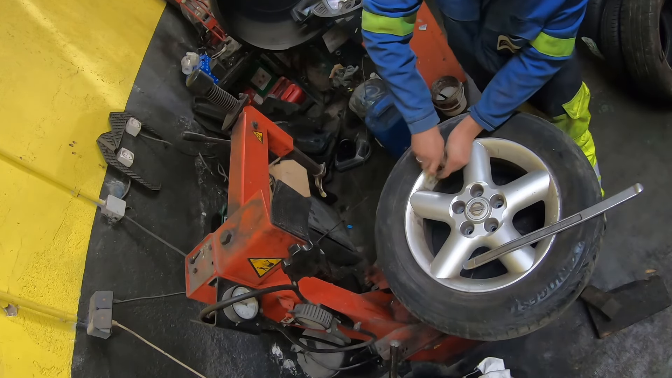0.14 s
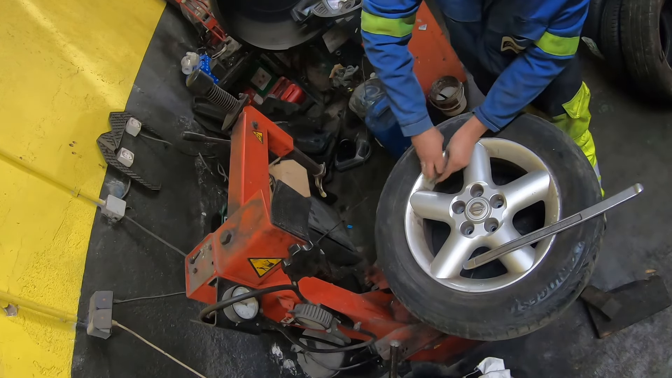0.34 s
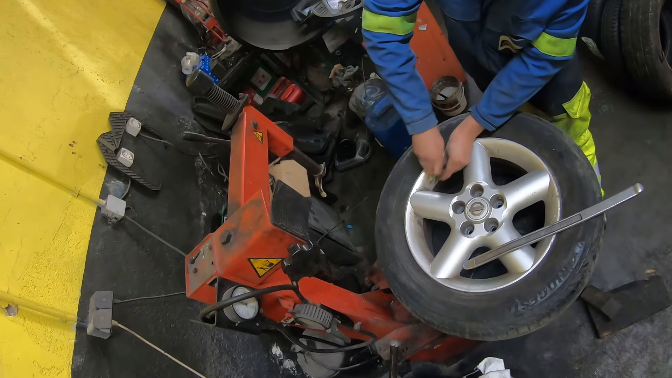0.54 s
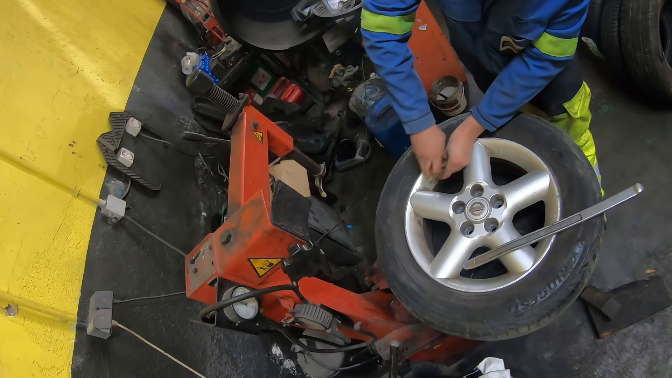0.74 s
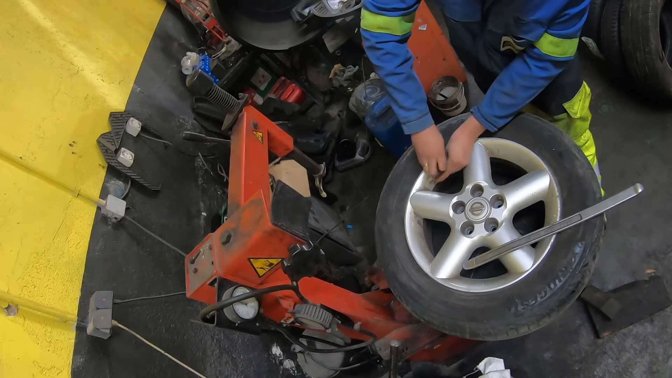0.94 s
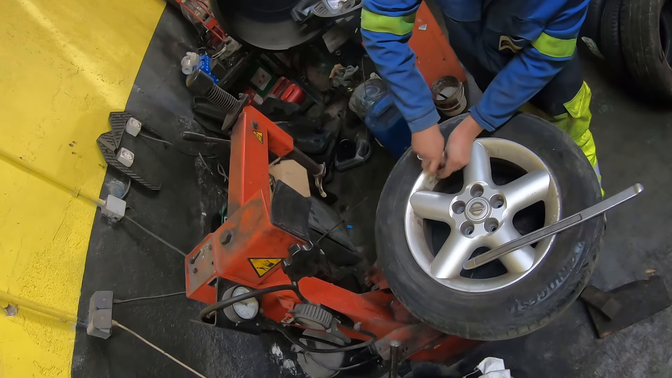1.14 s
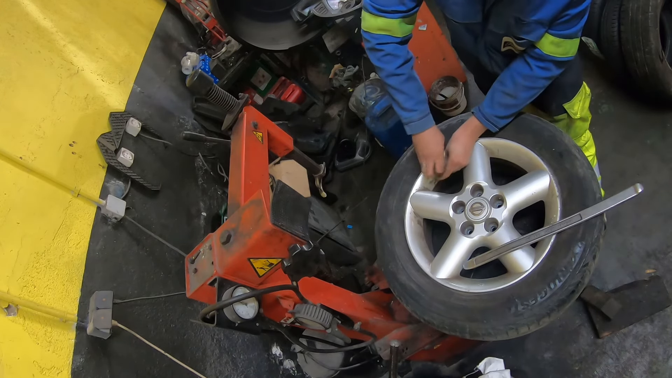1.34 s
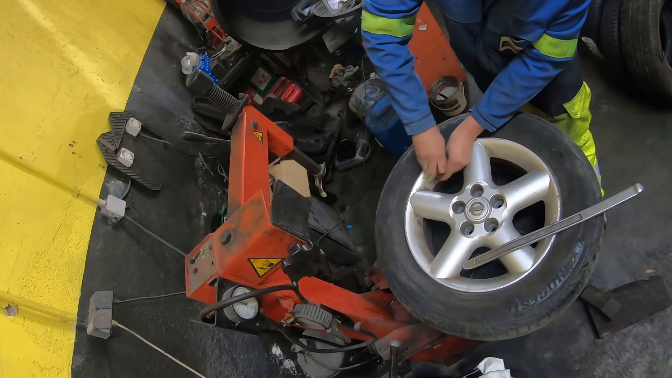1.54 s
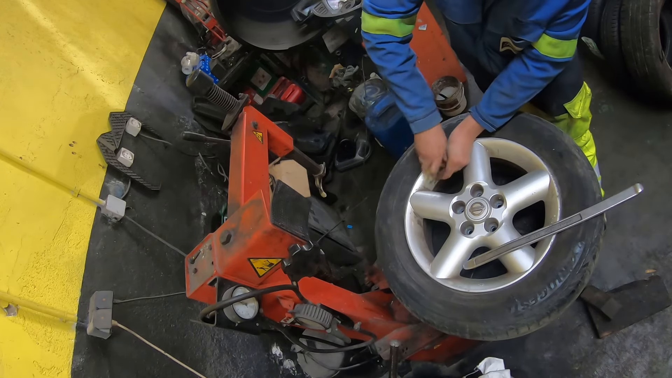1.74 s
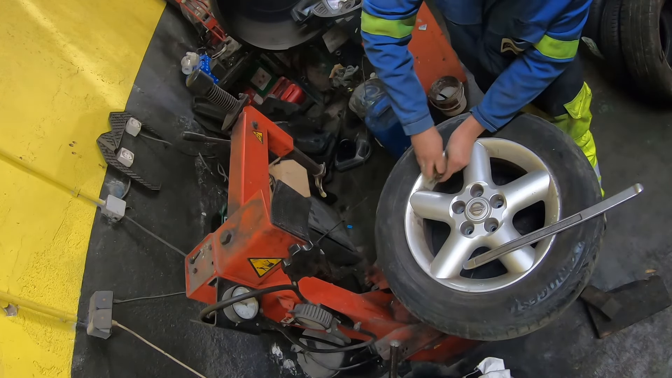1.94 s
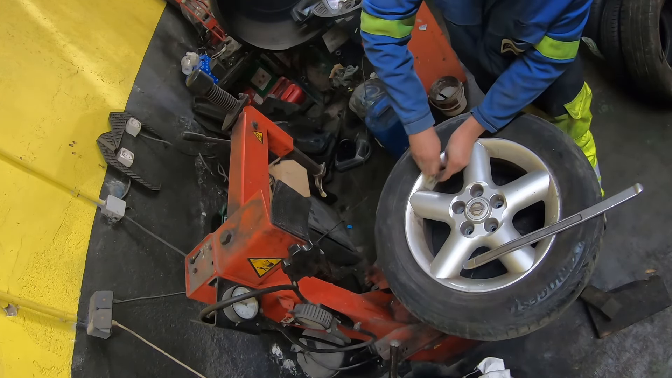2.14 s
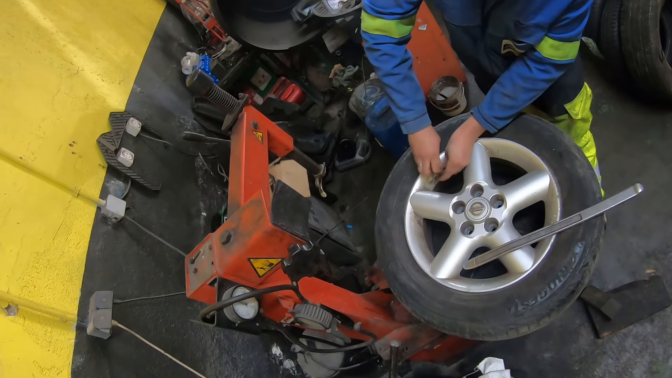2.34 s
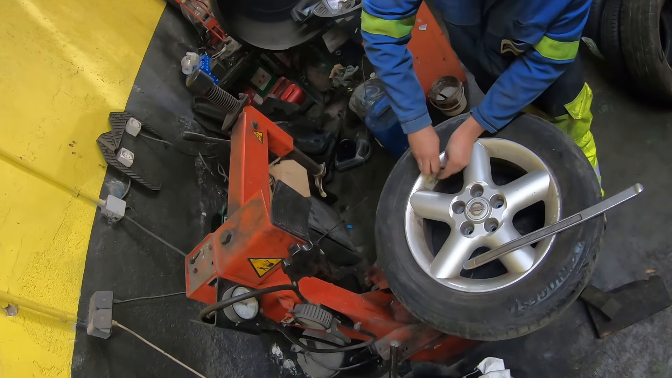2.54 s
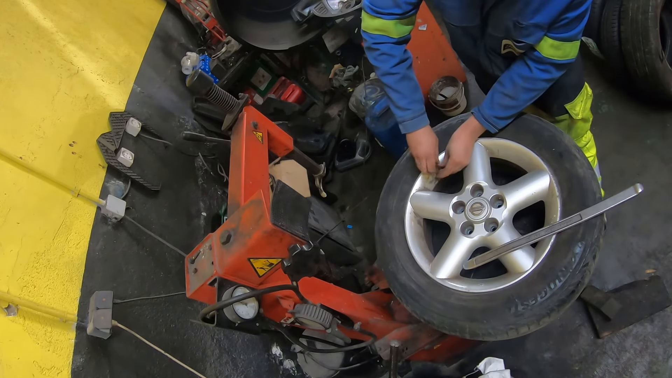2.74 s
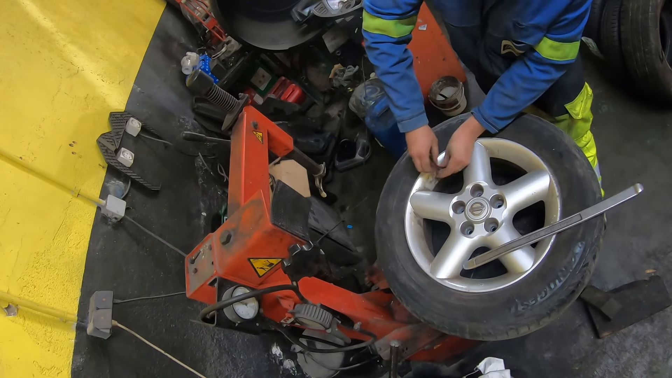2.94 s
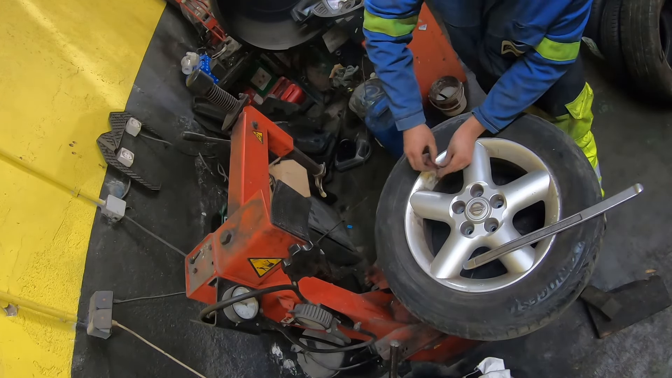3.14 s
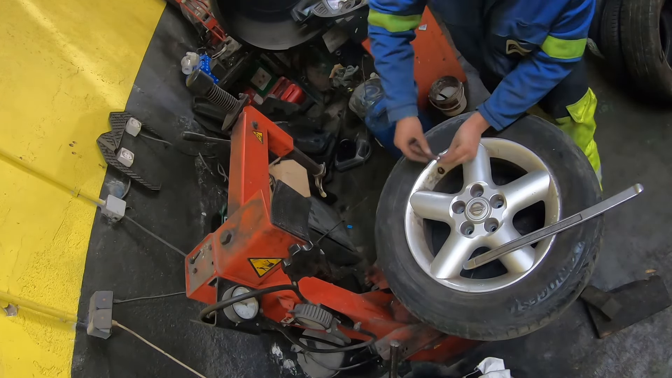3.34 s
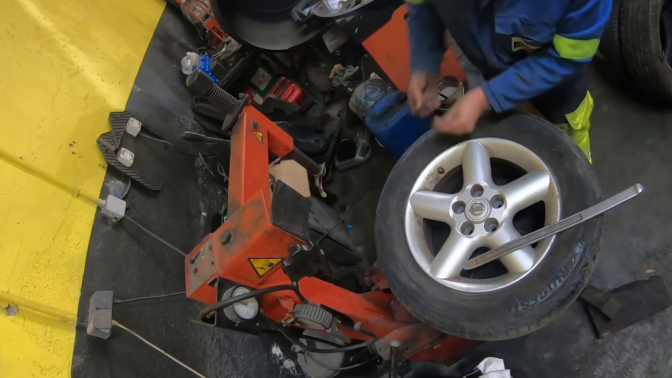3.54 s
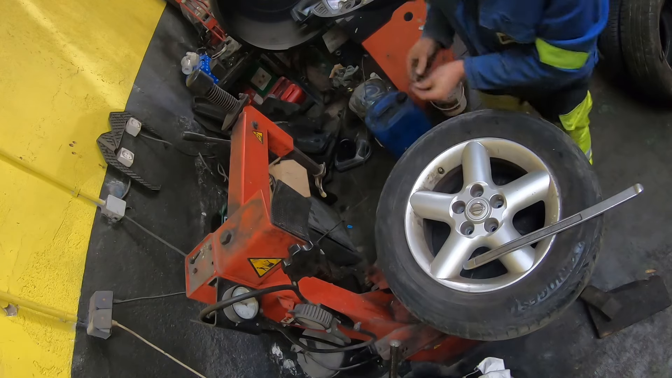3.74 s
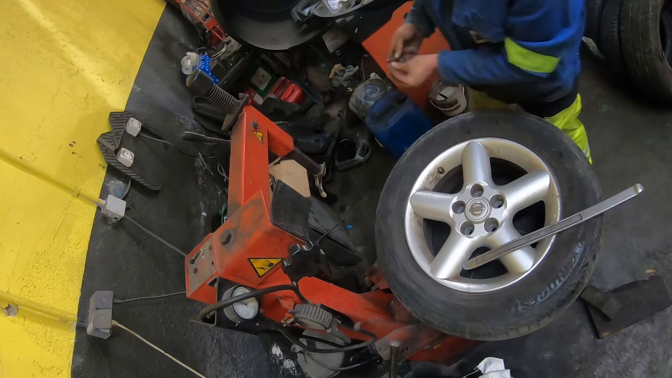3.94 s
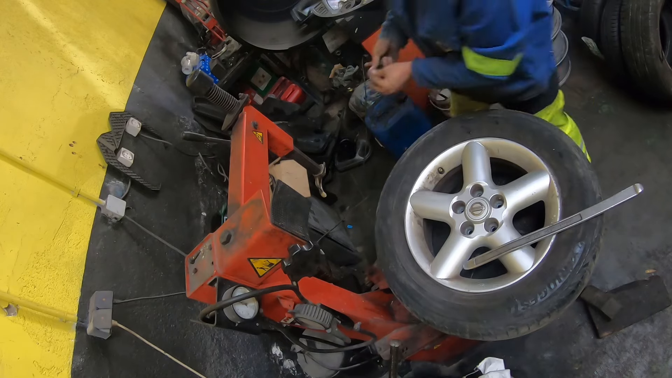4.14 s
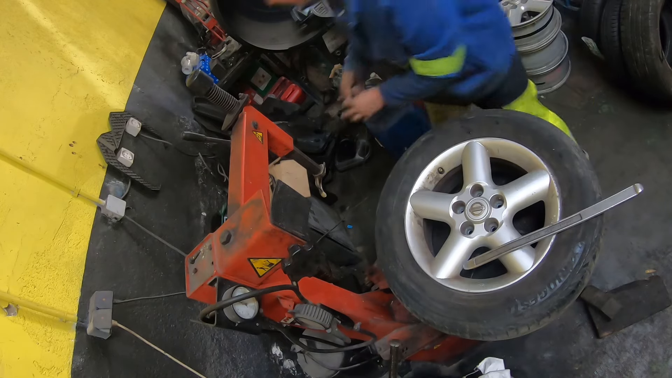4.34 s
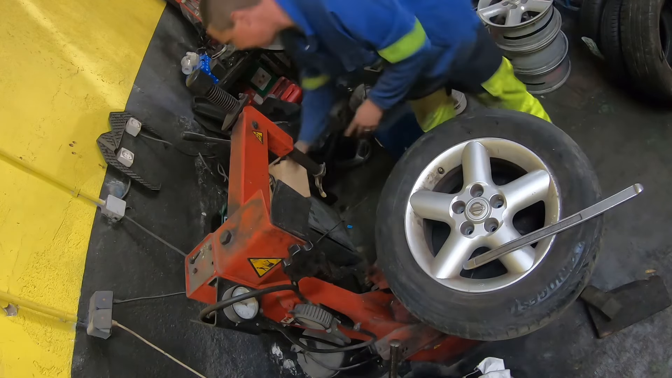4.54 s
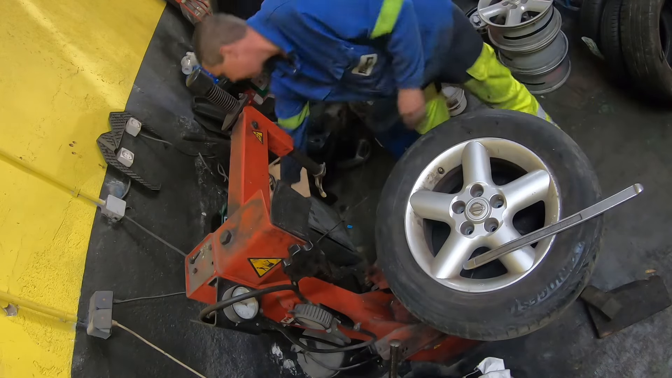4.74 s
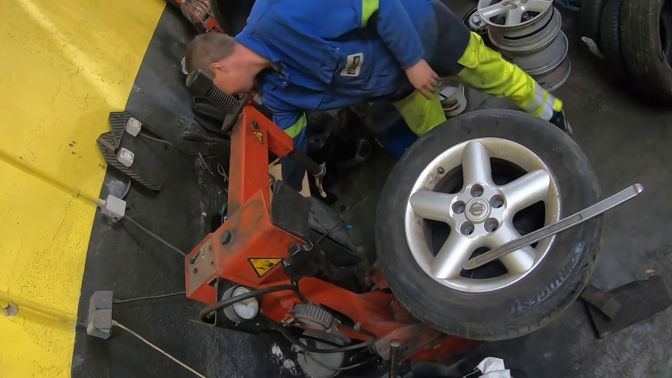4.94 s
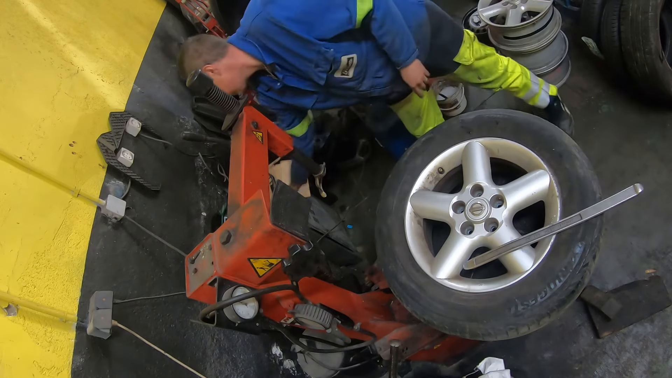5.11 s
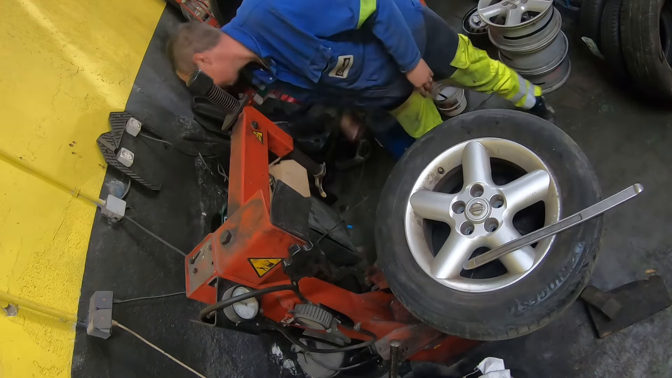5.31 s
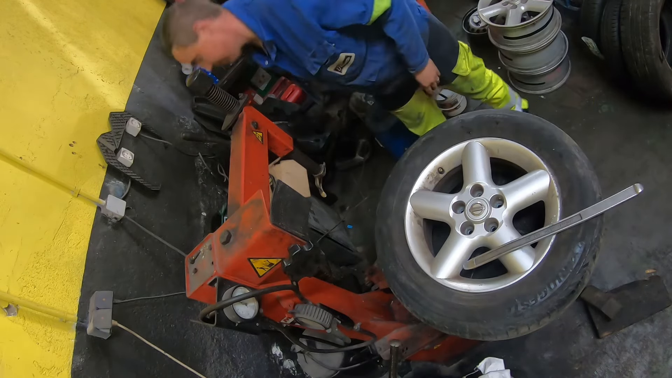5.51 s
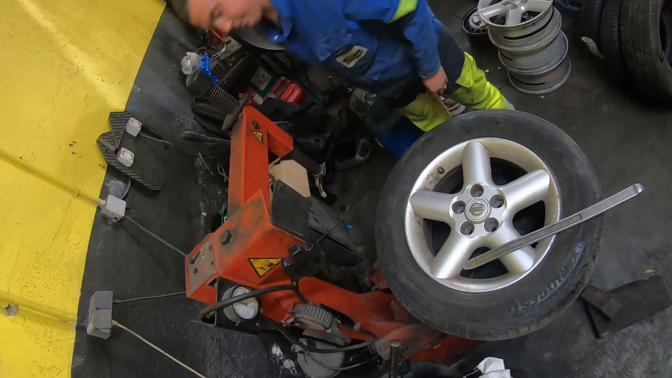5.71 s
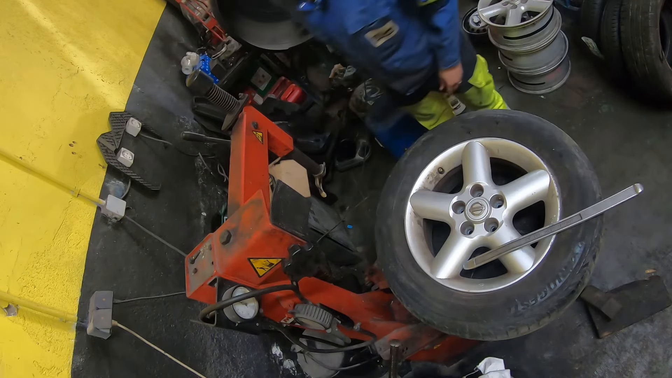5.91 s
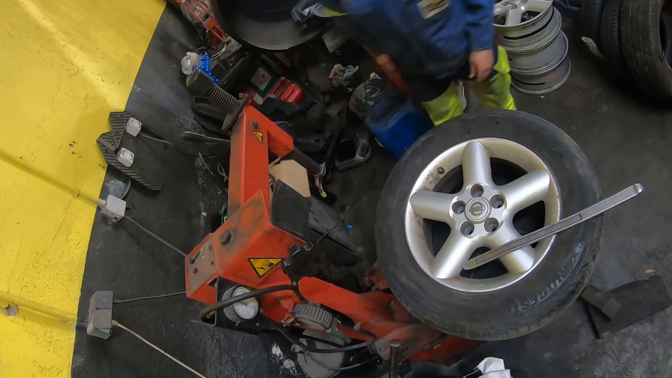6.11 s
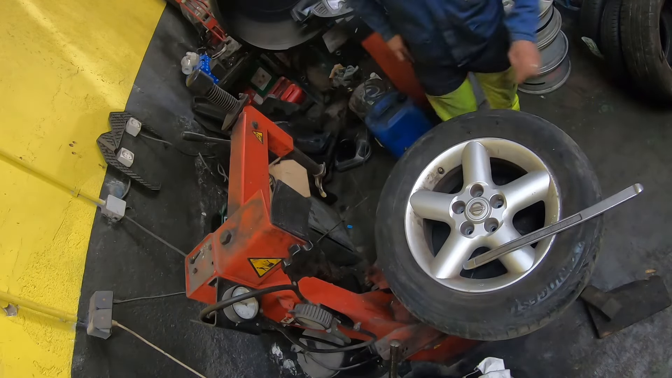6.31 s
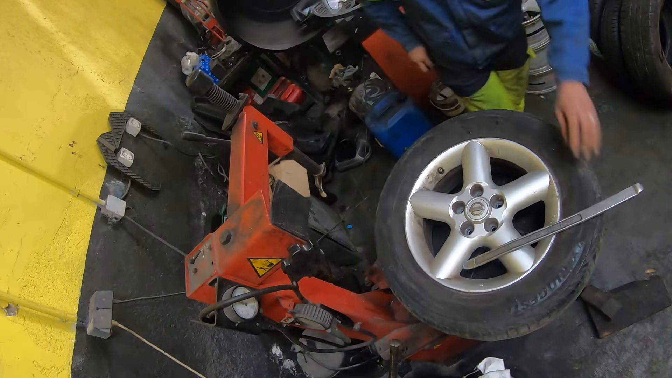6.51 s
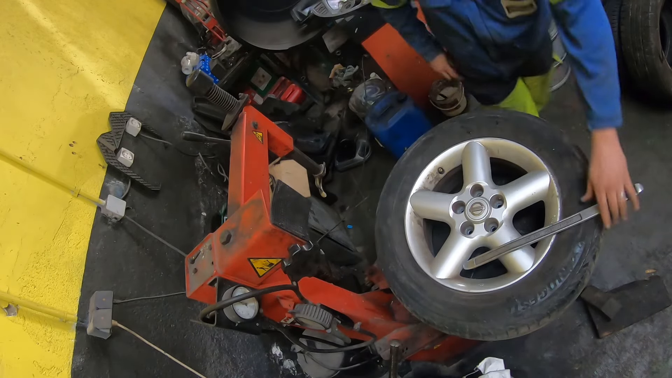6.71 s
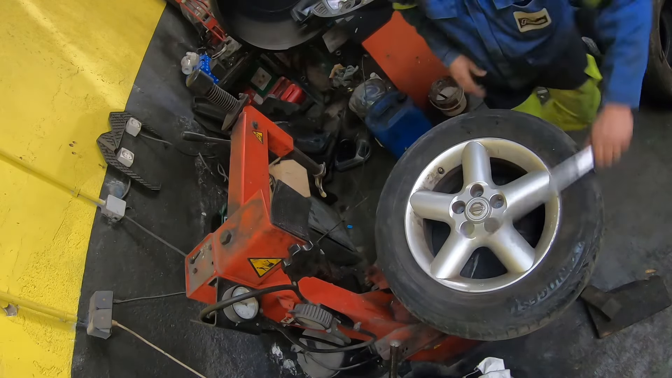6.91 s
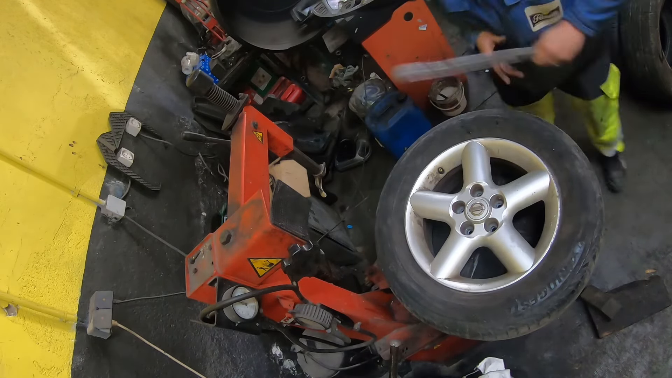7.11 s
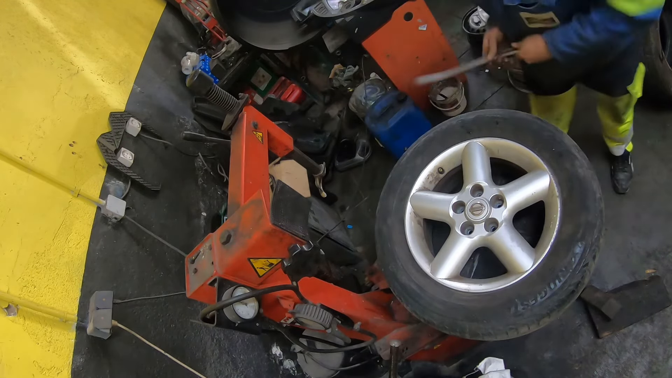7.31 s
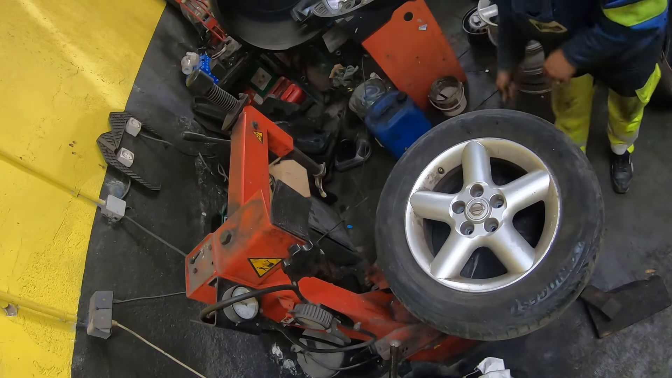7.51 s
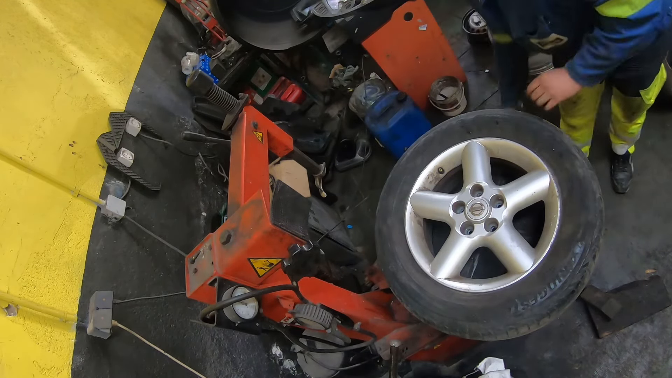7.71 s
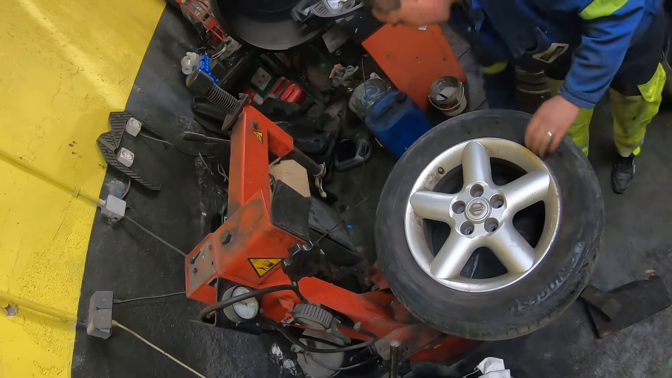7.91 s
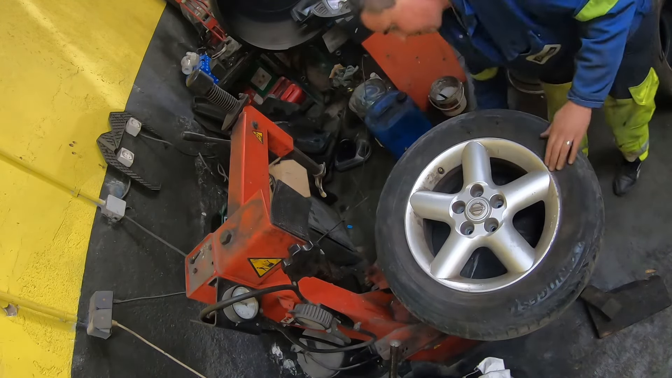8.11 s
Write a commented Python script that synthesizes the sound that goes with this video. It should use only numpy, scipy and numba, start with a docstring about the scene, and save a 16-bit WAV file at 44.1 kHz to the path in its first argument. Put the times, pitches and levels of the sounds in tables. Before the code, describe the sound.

A thin leak of air spurts unevenly from a tyre valve being loosened. The core comes free with a loud burst and chirping whistles, and a strong, high hiss carries on. Under it come a soft floor thud and later a lever's clink on the rim, before a short rubbery judder as the wheel is shoved. Workshop machines hum behind throughout, all heard in mono.

```python
"""A fitter unscrews a tyre valve core in a workshop; machines drone behind. Air seeps past the loose
core and spurts at each turn of the tool. At 2.3 s it bursts out, whistles over the tool's edge and
puffs between cupped fingers, then settles to a free jet ringing in the valve stem. A dull thud on the
floor follows at 4.9 s. At 6.8 s a tyre lever knocks the rim as it is lifted off. At 8.1 s the wheel
is shoved, its rubber juddering on the steel table; the hiss ducks under it. One microphone."""
import sys
import numpy as np
from scipy import signal
from scipy.fft import rfft, irfft
from scipy.io import wavfile
from numba import njit

SR = 44100
rng = np.random.default_rng(int(sys.argv[2]) if len(sys.argv) > 2 else 0)


def output_pcm(signal):
    """Save a mono or channel-first signal as 16-bit PCM at the path in sys.argv[1].

    Samples are clipped to [-1, 1] before scaling.
    """
    pcm = np.clip(np.atleast_2d(signal).T, -1, 1) * 32767
    wavfile.write(sys.argv[1], SR, np.round(pcm).astype(np.int16))


N = 364266
BIN_HZ = np.maximum(np.arange(N // 2 + 1) * SR / N, 1)

# Workshop noise spectra. Each row: frequency in Hz, relative density in dB.
DRONE_SPECTRUM = [(100, -40), (200, -5.5), (300, -4.5), (680, -9.5), (1380, -9), (1880, -12.5), (2240, -13),
                  (3000, -7.5), (3900, -30), (6600, -90)]
HUM_SPECTRUM = [(80, -38), (105, -13), (140, -8.5), (158, -7), (168, 6), (178, -17), (205, -7), (260, -44)]
RUMBLE_SPECTRUM = [(20, -20), (36, -26), (54, -3.5), (75, -12), (110, -23), (200, -44)]
# Machine whines. Each row: centre in Hz, width in Hz, level in dB re WHINE_DB.
WHINES = [(952, 22, -8.5), (1038, 14, -10.5), (1390, 18, -6.5), (1600, 40, -15), (1803, 20, -14.5),
          (1899, 14, -7), (1918, 18, -8.5), (2040, 25, -15)]
# Drone, whines and hum sound quieter under the air burst, and most under the wheel shove.
# Each row: time in seconds, gain in dB.
SHOP_DIP = [(0, -0.5), (2.3, 0), (2.41, -6), (2.7, -13), (3.0, -10.5), (3.6, -7.5), (4.2, -6.5), (4.9, -5),
            (8.1, -5), (8.2, -17.5)]
# Rumble before its lumps. Each row: time in seconds, level in dB.
RUMBLE_ENVELOPE = [(0, -46), (.6, -49), (1.1, -44.5), (2.0, -47.5), (2.45, -42), (2.75, -46.5), (3.2, -55),
                   (3.7, -64), (4.25, -61), (4.45, -48.5), (6.0, -49), (6.25, -61), (6.45, -47),
                   (7.6, -52.5), (8.26, -57)]
DRONE_DB, WHINE_DB, HUM_DB, LUMP_DB, LUMP_RATE_HZ = -39.5, -43, -46.5, 4.0, 3.5

# Floor thuds. Each row: start in seconds, peak in dB, pitch in Hz, T60 in seconds.
THUDS = [(4.868, -30, 115, 0.33)]
# Lever on rim. Each row: time in seconds, click level in dB.
LEVER_KNOCKS = [(6.829, -25.5), (6.841, -26.5)]
# Modes of rim and table. Each row: frequency in Hz, relative level in dB, T60 in seconds.
RIM_MODES = [(550, 7.5, 0.0061), (967, -5, .12), (1290, -5, 0.0099), (1693, 1, 0.073), (2360, 4, .012),
             (2850, 2.5, 0.026)]
TABLE_MODES = [(164, -7.5, 0.093), (251, -10, 0.049), (351, 1, 0.054), (510, -6.5, 0.014),
               (730, -3.5, 0.021), (870, -3, 0.0053), (1200, -10, 0.013), (1450, -11, 0.0062),
               (1850, -3.5, 0.0083), (2380, -10, 0.0093), (2680, -4.5, 0.078), (3500, -12, 0.0077),
               (4200, -9, 0.0034)]
# A nudge, three jolts. Each row: start and hold in seconds, low and high mode levels in dB.
WHEEL_JOLTS = [(8.055, .04, -31.5, -47), (8.097, 0.036, -18, -24), (8.14, 0.046, -20.5, -28),
               (8.197, .035, -15.5, -38)]

# Air noise spectra. Each row: frequency in Hz, relative density in dB.
SEEP_SPECTRUM = [(1060, -41), (1800, -32), (1880, -2), (2230, -17.5), (4350, -5.5), (4890, -2), (6530, -12),
                 (7400, -11.5), (9110, -11), (15500, -48)]
SPURT_SPECTRUM = [(1500, -21), (3000, -11), (4300, -8), (5500, -4.5), (7500, -8), (10000, -13),
                  (12000, -26.5), (16000, -40)]
JET_SPECTRUM = [(290, -37), (500, -26.5), (940, -15.5), (2160, -10), (3740, -7.5), (6000, -3.5), (7450, -2),
                (8850, -4), (10600, -7.5), (11500, -15), (13500, -17), (16000, -27)]
# Peaks and dips of the core gaps, then of stem and rim. Each row: centre in Hz, width in Hz, lift in dB.
SEEP_RESONANCES = [(3190, 76, 7.5), (4080, 26, 10.5), (4600, 60, -3), (5160, 280, -4), (6000, 260, 2.5),
                   (6560, 80, 9), (7040, 190, 7), (7540, 120, 9.5), (8950, 110, -1), (9430, 100, 4),
                   (10600, 180, 3)]
SPURT_RESONANCES = [(4100, 120, 4), (4750, 40, 16), (5070, 290, 8), (6100, 240, 10.5), (6600, 200, -2),
                    (7200, 250, 8.5), (8820, 120, 8), (10600, 180, 7)]
STEM_RESONANCES = [(2200, 120, -3), (2730, 200, 3), (3200, 300, 3), (3650, 200, -2), (4200, 300, 2),
                   (5250, 200, 3), (5700, 200, 3), (6000, 200, -2), (6820, 200, 2), (7080, 100, -3),
                   (7400, 480, 3), (8120, 200, -3), (8880, 350, 5), (9850, 150, -5), (10300, 380, 4),
                   (10730, 90, 3), (14250, 300, -5)]
# Spurts at the tool's turns. Each row: start in seconds, hold in seconds, level in dB.
TURN_SPURTS = [(.03, .07, -36), (.28, 0.023, -37), (.455, 0.081, -33), (.66, 0.045, -37.5),
               (.795, 0.13, -33.5), (.965, 0.076, -35), (1.295, 0.027, -38), (1.4, .11, -29.5),
               (1.925, 0.019, -38), (2.03, .02, -43), (2.078, .12, -33), (2.26, .03, -31)]
SEEP_DB, CORE_OUT_S, SEEP_FADE_S = -35.5, 2.28, .065

# Hollow between the fingers. Each row: time in seconds, centre in Hz, level in dB.
PUFF_PATH = [(2.74, 4100, -51), (2.82, 3970, -37), (2.95, 4100, -35.5), (3.15, 2620, -39.5),
             (3.25, 2000, -45), (3.35, 1220, -31.5), (3.46, 950, -42)]
# Edge whistle. Each row: time in seconds, centre in Hz.
EDGE_PITCH = [(2.41, 6100), (2.435, 5660), (2.55, 5950), (2.6, 6000), (2.67, 5340), (2.78, 5150),
              (3.05, 4900)]
# Chirps, held whistle and rasp. Each row: start in seconds, hold in seconds, level in dB.
EDGE_CHIRPS = [(2.404, .011, -17), (2.432, .013, -16.5), (2.541, 0.027, -21.5), (2.62, 0.04, -21.5),
               (2.655, 0.047, -18.5), (2.765, 0.032, -22.5)]
EDGE_HELD = [(2.445, 0.019, -26.5), (2.47, .55, -26.5)]
EDGE_RASP = [(2.76, 0.27, -33)]

# Jet level as heard, before shading; the hiss ducks under the loud shove.
# Each row: time in seconds, level in dB.
JET_ENVELOPE = [(2.28, -50), (2.315, -18), (2.4, -18.5), (2.42, -28.5), (2.52, -27), (2.56, -23.5),
                (2.63, -20.5), (2.67, -27.5), (2.8, -21), (2.96, -21.5), (3.33, -22), (3.42, -24.5),
                (4.9, -22.5), (6.8, -23), (8.09, -24.5), (8.12, -31.5), (8.195, -31.5), (8.23, -38)]
# Fingers and core shade the jet. Each row: time in seconds, gain in dB per octave below, above PIVOT_HZ.
JET_SHADING = [(2.4, -2.2, -3.5), (2.43, -4, -6), (2.74, -3, -5.5), (2.8, -2.5, -13), (2.88, -3.2, -8.5),
               (2.96, -2.4, -1.3), (3.3, 0.9, -2.5), (3.45, -0.5, -1.5)]
# Stem tones set in as pressure falls.
# Each row: centre and width in Hz, start and rise in seconds, level in dB re JET_ENVELOPE.
LATE_TONES = [(8870, 770, 3.3, 0.15, -6.5), (7210, 540, 6.7, .3, -8.5)]
PIVOT_HZ, ECHO_DB, ECHO_T60_S, CUTOFF_HZ = 6000, -15, .1, 15700


def from_db(db):
    """Decibels to gain."""
    return 10 ** (np.asarray(db) / 20)


def unit_rms(x):
    """Scale to rms 1."""
    return x / np.sqrt(np.mean(x ** 2) + 1e-20)


def curves(rows):
    """Timed rows to one per-sample curve per column."""
    times_s, *columns = np.transpose(rows)
    return [np.interp(np.arange(N) / SR, times_s, column) for column in columns]


def ramp(start_s, rise_s):
    """Linear rise from 0 to 1."""
    return np.clip((np.arange(N) / SR - start_s) / rise_s, 0, 1)


def swells(rows, attack_s, fade_db_per_s):
    """Gain of events that rise, hold and fade; powers add."""
    power = 0
    for start_s, hold_s, db in rows:
        fading_s = np.clip(np.arange(N) / SR - start_s - attack_s - hold_s, 0, 1)
        power += (ramp(start_s, attack_s) * from_db(db - fade_db_per_s * fading_s)) ** 2
    return np.sqrt(power)


def drift(rate_hz):
    """Slow random wander, rms 1."""
    r = np.exp(-40 * np.pi * rate_hz / SR)
    slow = signal.lfilter([1], [1, -2 * r, r * r], rng.standard_normal(N // 20 + 4002))[4000:]
    return np.interp(np.arange(N) / 20, np.arange(len(slow)), unit_rms(slow))


def shaped_noise(spectrum, resonances=()):
    """Noise with a spectrum plus resonant lifts, rms 1."""
    points_hz, points_db = np.transpose(spectrum)
    db = np.interp(np.log(BIN_HZ), np.log(points_hz), points_db)
    for hz, width_hz, lift_db in resonances:
        db += lift_db / (1 + (2 * (BIN_HZ - hz) / width_hz) ** 2)
    return unit_rms(irfft(rfft(rng.standard_normal(N)) * from_db(db), N))


def narrow_noise(hz, width_hz):
    """Noise in one resonance, rms 1."""
    response = 1 / (1 + (2 * (BIN_HZ - hz) / width_hz) ** 2)
    return unit_rms(irfft(rfft(rng.standard_normal(N)) * response, N))


def ring(drive, hz, t60_s):
    """One mode: a unit click starts a decaying unit sine."""
    r, w = from_db(-60 / (t60_s * SR)), 2 * np.pi * hz / SR
    return signal.lfilter([0, np.sin(w)], [1, -2 * r * np.cos(w), r * r], drive + 1e-18)


@njit
def sweep(x, cosine, r):
    """Two-pole resonator with moving centre and width."""
    out = np.zeros(len(x))
    for i in range(2, len(x)):
        out[i] = x[i] + 2 * r[i] * cosine[i] * out[i - 1] - r[i] * r[i] * out[i - 2]
    return out


def swept_noise(hz, width_hz):
    """Noise twice through a sliding resonance, level evened."""
    w, r = 2 * np.pi * hz / SR, np.exp(-np.pi * width_hz / SR)
    gain = (1 - r * r) * np.sin(w)
    tone = rng.standard_normal(N)
    for _ in range(2):
        tone = gain * sweep(tone, np.cos(w), r)
    return tone * np.sqrt(2 * SR / (np.pi * width_hz))


def workshop():
    """Machines: broad drone, narrow whines, low hum, lumpy rumble."""
    dip_db, = curves(SHOP_DIP)
    machines = from_db(DRONE_DB) * shaped_noise(DRONE_SPECTRUM)
    for hz, width_hz, db in WHINES:
        machines += from_db(WHINE_DB + db) * narrow_noise(hz, width_hz)
    machines += from_db(HUM_DB) * shaped_noise(HUM_SPECTRUM)
    rumble_db, = curves(RUMBLE_ENVELOPE)
    lumps_db = LUMP_DB * np.clip(drift(LUMP_RATE_HZ), -3, 1.3)
    return from_db(dip_db) * machines + from_db(rumble_db + lumps_db) * shaped_noise(RUMBLE_SPECTRUM)


def floor_thud():
    """A dying noise burst drives one low floor resonance."""
    out, length = np.zeros(N), SR // 2
    for start_s, peak_db, hz, t60_s in THUDS:
        start, burst = round(start_s * SR), np.zeros(N)
        fade = from_db(-60 * np.arange(length) / (t60_s * SR))
        burst[start:start + length] = fade * rng.standard_normal(length)
        thud = ring(ring(burst, hz, t60_s=0.028), hz, t60_s=0.028)
        out += from_db(peak_db) * thud / np.abs(thud).max()
    return out


def tyre_lever():
    """Two knocks ring the rim's modes."""
    clicks, out = np.zeros(N), np.zeros(N)
    for time_s, db in LEVER_KNOCKS:
        clicks[round(time_s * SR)] = from_db(db)
    for hz, db, t60_s in RIM_MODES:
        out = from_db(db + rng.normal(0, 1.9)) * ring(clicks, hz, t60_s) - out   # signs alternate
    return out


def wheel_shove(slips_per_s=1200, split_hz=1700):
    """Rubber judders on the steel table: dense uneven slips strike its modes."""
    low, high = np.zeros(N), np.zeros(N)
    for hz, db, t60_s in TABLE_MODES:
        sizes = from_db(1.7 * np.minimum(rng.exponential(1, N), 3)) * rng.choice([-1, 1], N)
        slips = sizes * (rng.random(N) < slips_per_s / SR)
        mode = from_db(db) * unit_rms(ring(slips, hz, t60_s))
        if hz < split_hz:
            low += mode
        else:
            high += mode
    low = signal.sosfilt(signal.butter(2, 100, "high", fs=SR, output="sos"), low)
    jolts = np.array(WHEEL_JOLTS)
    low_gain = swells(jolts[:, [0, 1, 2]], attack_s=.005, fade_db_per_s=350)
    high_gain = swells(jolts[:, [0, 1, 3]], attack_s=.005, fade_db_per_s=350)
    return low_gain * unit_rms(low) + high_gain * unit_rms(high)


def add_echoes(air):
    """Faint echoes off wheel, machine and body ripple the spectrum."""
    delay_s = np.arange(1, SR // 10) / SR
    echoes = rng.standard_normal(len(delay_s)) * from_db(-60 * delay_s / ECHO_T60_S)
    response = np.r_[1, from_db(ECHO_DB) * echoes / np.linalg.norm(echoes)]
    return signal.fftconvolve(air, response)[:N]


def core_leak():
    """Seep and spurts ring in the gaps around the core until it comes free."""
    seep = from_db(SEEP_DB) * shaped_noise(SEEP_SPECTRUM, SEEP_RESONANCES)
    seep_gain = 1 - ramp(CORE_OUT_S, SEEP_FADE_S)
    spurts = from_db(1.2 * drift(9.9)) * shaped_noise(SPURT_SPECTRUM, SPURT_RESONANCES)
    spurt_gain = swells(TURN_SPURTS, attack_s=.018, fade_db_per_s=250)
    return seep_gain * seep + spurt_gain * spurts


def finger_puff():
    """A broad resonance falls as the hollow between the fingers grows; the flow flickers."""
    hz, level_db = curves(PUFF_PATH)
    width_hz = np.minimum(1.6 * hz, 2240)
    gate = ramp(PUFF_PATH[0][0] - .01, .01) - ramp(PUFF_PATH[-1][0], 0.086)
    air = gate * from_db(level_db + 1.2 * drift(60)) * swept_noise(hz, width_hz)
    return signal.sosfilt(signal.butter(4, 650, "high", fs=SR, output="sos"), air)


def edge_whistle():
    """Air on the tool's edge: chirps, a faint held tone, a lower rasp. Pitch sags as the core tilts."""
    hz, = curves(EDGE_PITCH)
    chirp_gain = swells(EDGE_CHIRPS, attack_s=.003, fade_db_per_s=1400)
    held_gain = swells(EDGE_HELD, attack_s=.01, fade_db_per_s=120)
    rasp = swells(EDGE_RASP, attack_s=.01, fade_db_per_s=120) * narrow_noise(hz=4120, width_hz=500)
    return np.hypot(chirp_gain, held_gain) * swept_noise(hz, width_hz=np.full(N, 640)) + rasp


def valve_jet():
    """Turbulence rings the stem; its half-octave bands flicker and are tilted by the shading."""
    level_db, = curves(JET_ENVELOPE)
    roar_db_per_octave, sizzle_db_per_octave = curves(JET_SHADING)
    spectrum = rfft(shaped_noise(JET_SPECTRUM, STEM_RESONANCES))
    gust_db, out = 0.15 * drift(8.8), np.zeros(N)
    for octave in np.arange(-4, 2, .5):
        offset = np.clip((np.log2(BIN_HZ / PIVOT_HZ) - octave) * 2, -1, 1)
        band = irfft(spectrum * np.cos(offset * np.pi / 2) ** 2, N)
        tilt_db = abs(octave) * (sizzle_db_per_octave if octave > 0 else roar_db_per_octave)
        out += band * from_db(tilt_db + gust_db + 0.92 * drift(9.7))
    for hz, width_hz, start_s, rise_s, db in LATE_TONES:
        out += ramp(start_s, rise_s) * from_db(db) * narrow_noise(hz, width_hz)
    return ramp(CORE_OUT_S - .01, .01) * from_db(level_db) * out


def scene():
    """Mono mix on two channels."""
    air = core_leak() + valve_jet() + edge_whistle() + finger_puff()
    mono = add_echoes(air) + workshop() + tyre_lever() + floor_thud() + wheel_shove()
    return np.stack([mono, mono])


def record(dry):
    """Soft clip, then steep low-pass."""
    clipped = .7 * np.tanh(dry / .7)
    return signal.sosfilt(signal.ellip(14, .3, 70, CUTOFF_HZ, fs=SR, output="sos"), clipped)


dry = scene()
out = record(dry)
output_pcm(out)
```